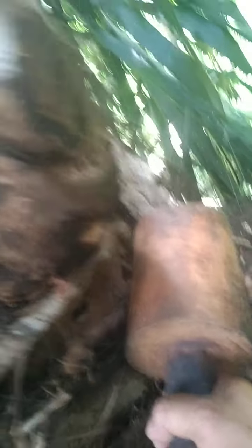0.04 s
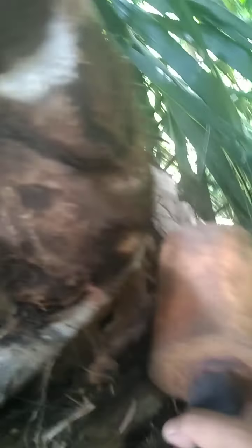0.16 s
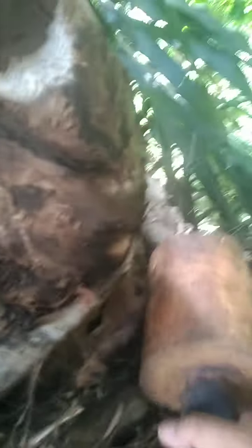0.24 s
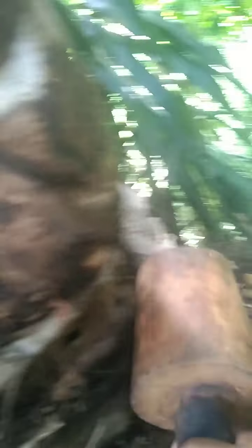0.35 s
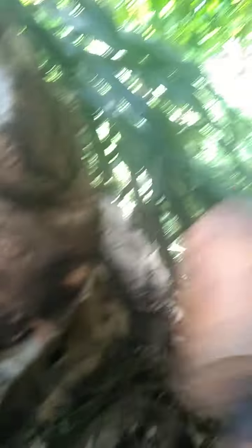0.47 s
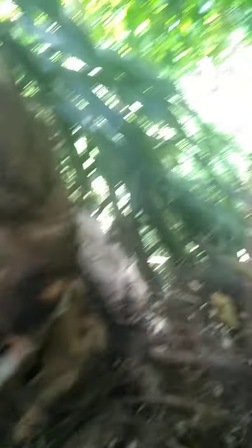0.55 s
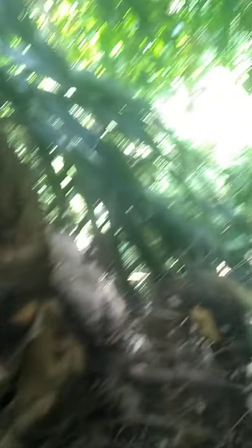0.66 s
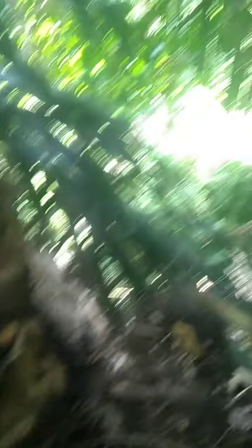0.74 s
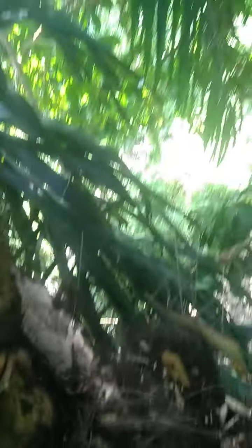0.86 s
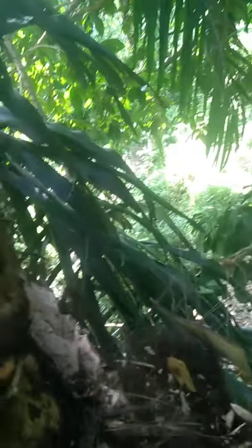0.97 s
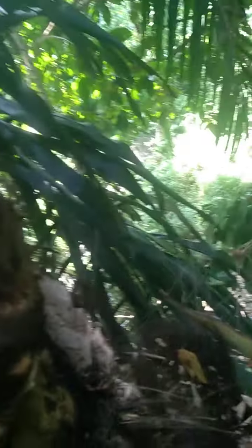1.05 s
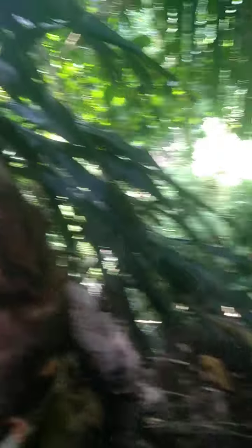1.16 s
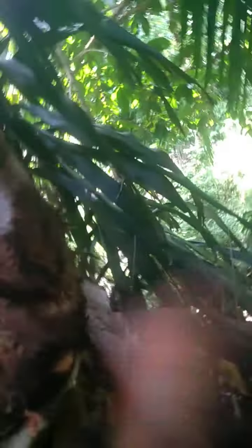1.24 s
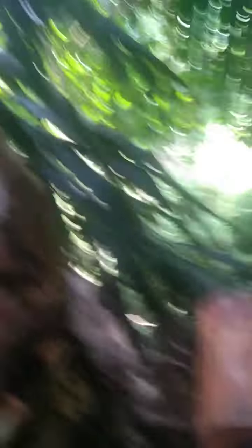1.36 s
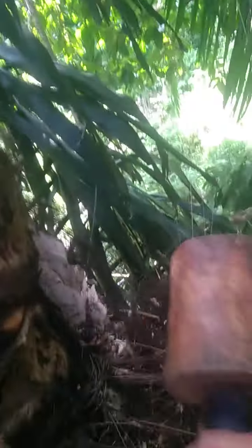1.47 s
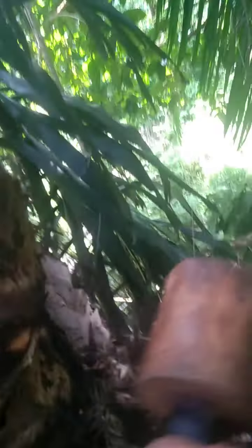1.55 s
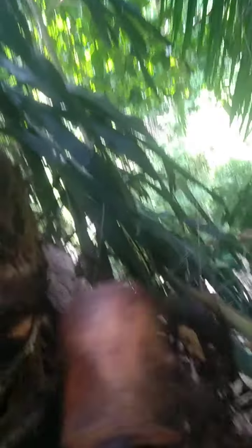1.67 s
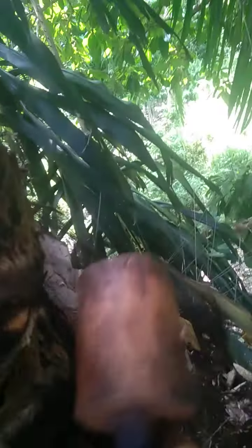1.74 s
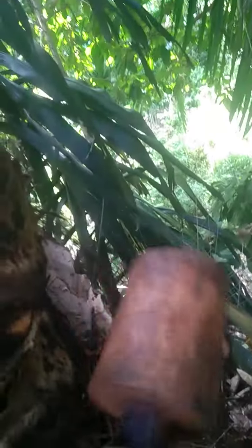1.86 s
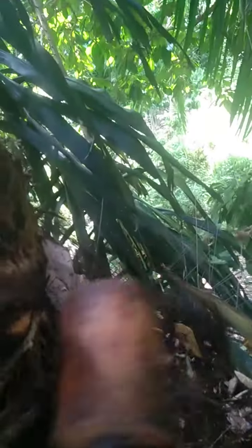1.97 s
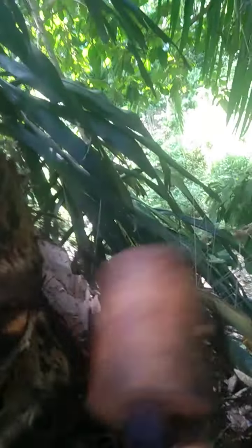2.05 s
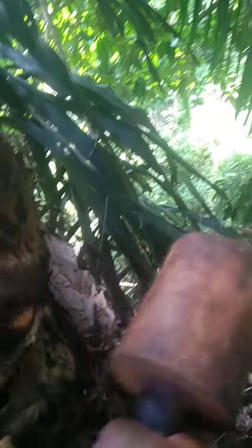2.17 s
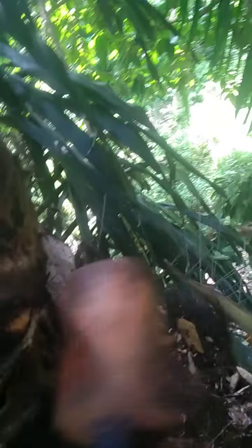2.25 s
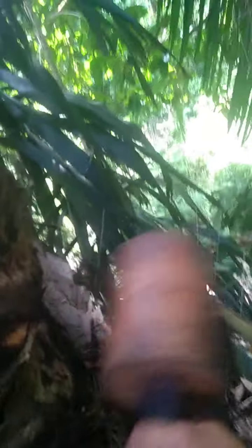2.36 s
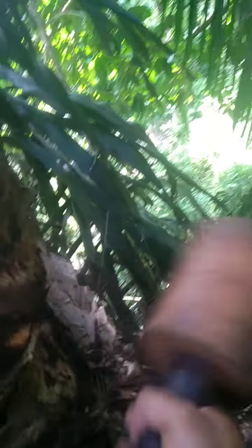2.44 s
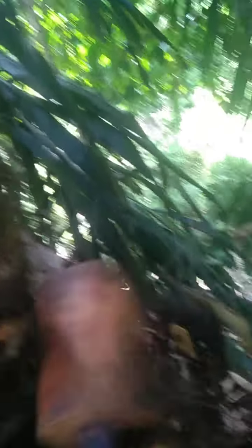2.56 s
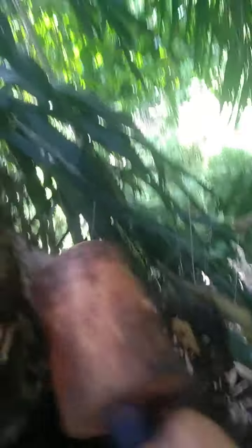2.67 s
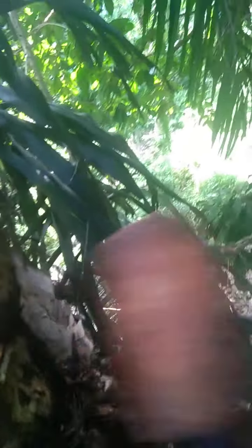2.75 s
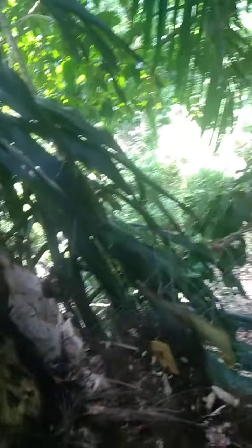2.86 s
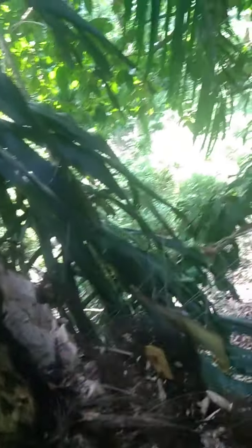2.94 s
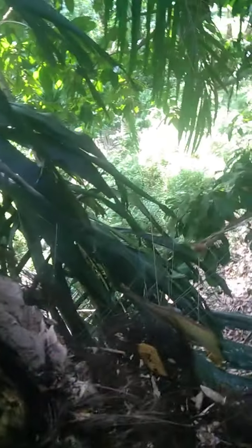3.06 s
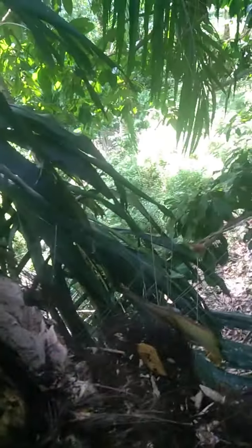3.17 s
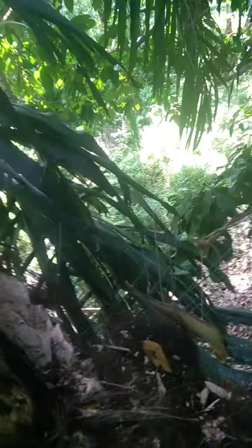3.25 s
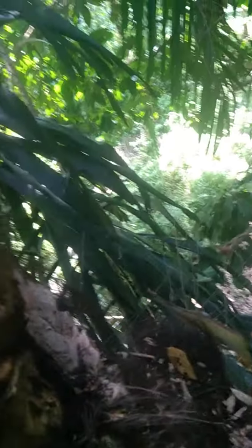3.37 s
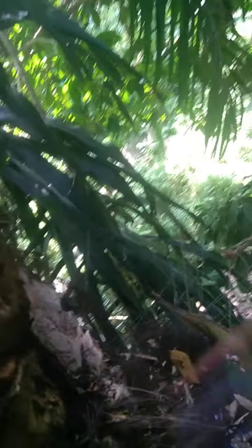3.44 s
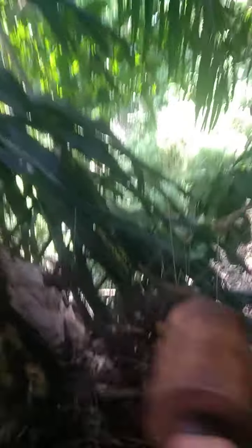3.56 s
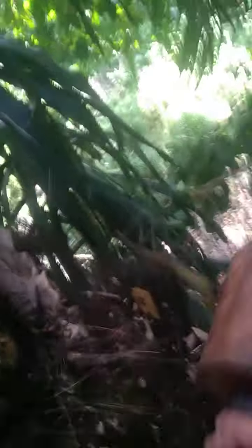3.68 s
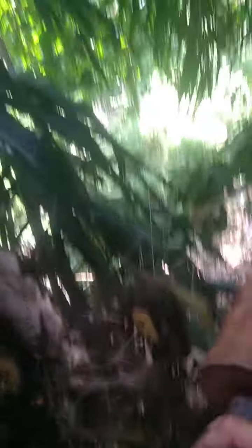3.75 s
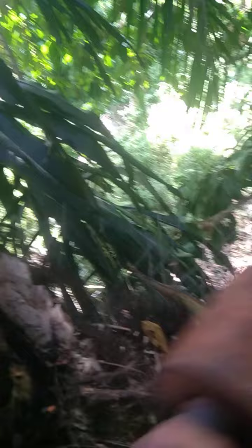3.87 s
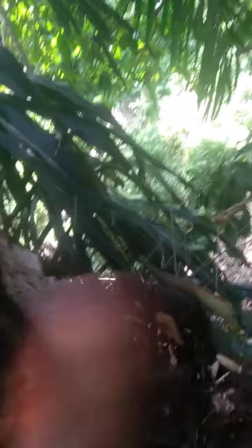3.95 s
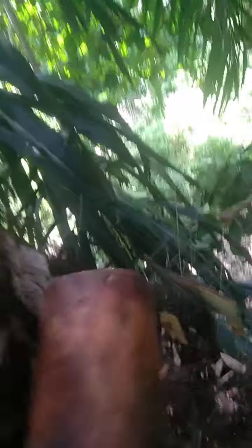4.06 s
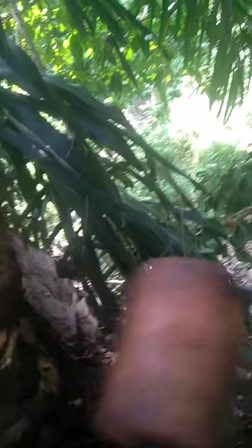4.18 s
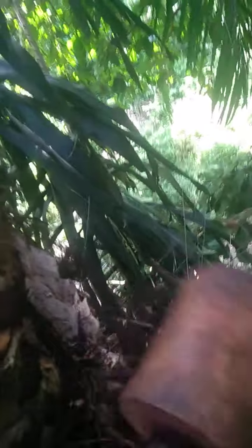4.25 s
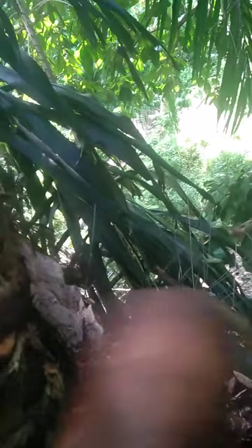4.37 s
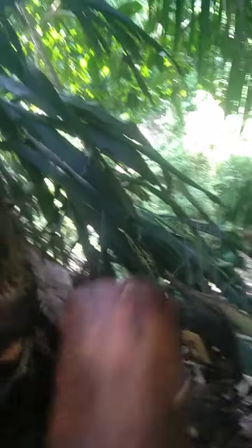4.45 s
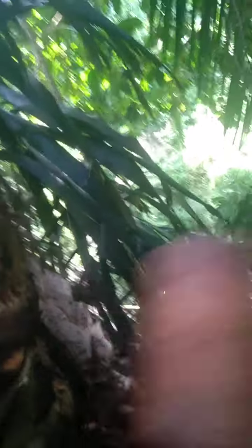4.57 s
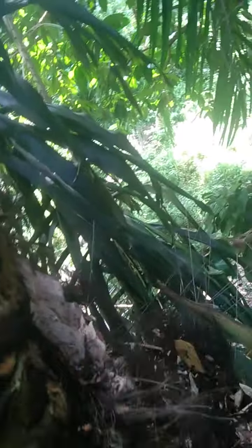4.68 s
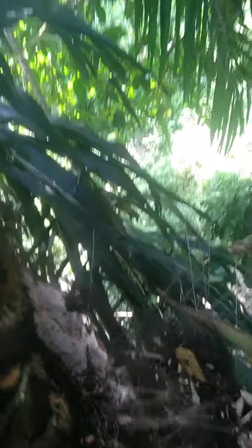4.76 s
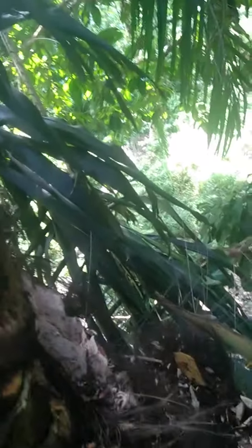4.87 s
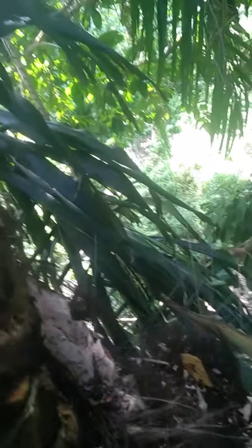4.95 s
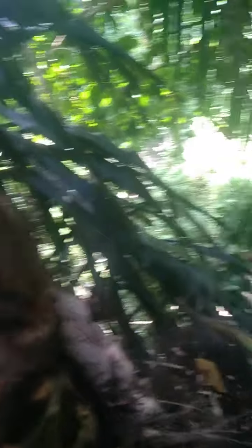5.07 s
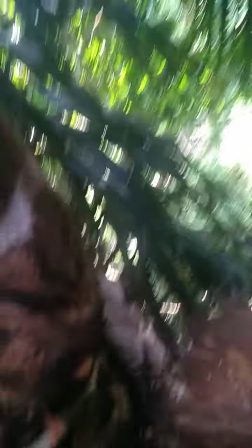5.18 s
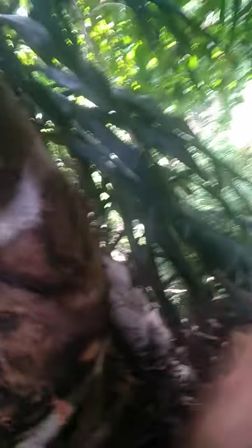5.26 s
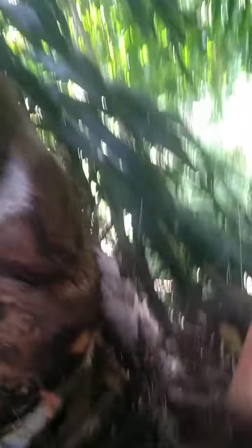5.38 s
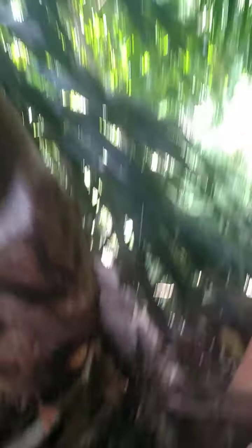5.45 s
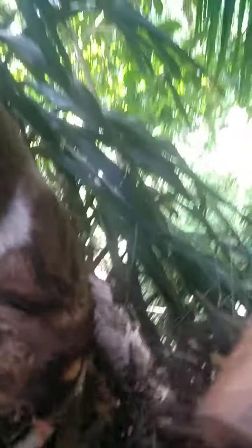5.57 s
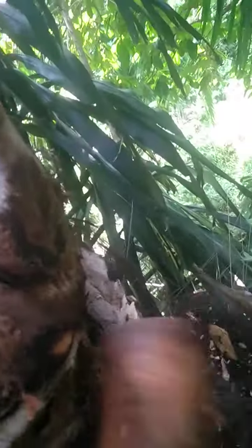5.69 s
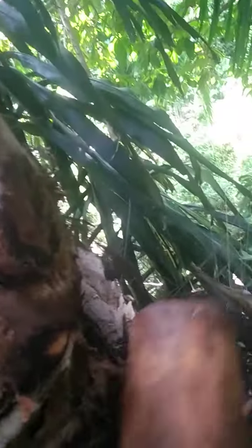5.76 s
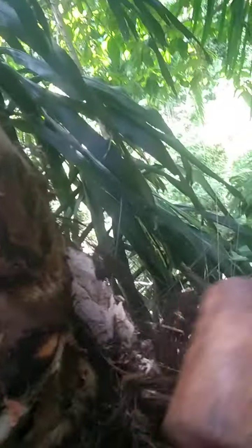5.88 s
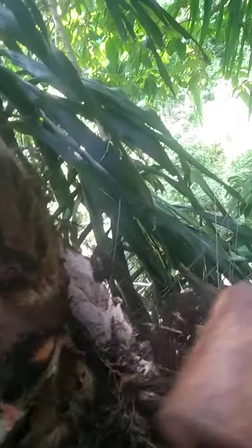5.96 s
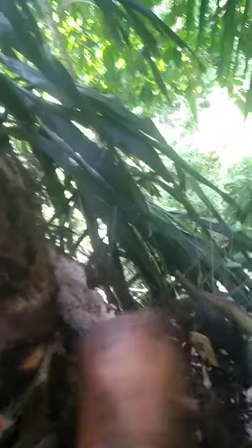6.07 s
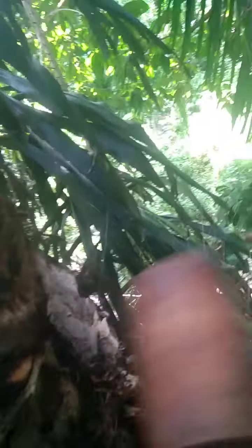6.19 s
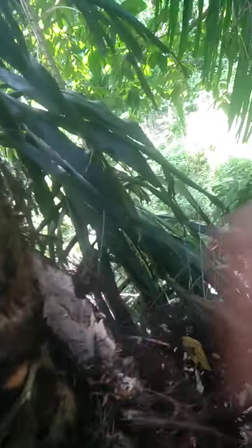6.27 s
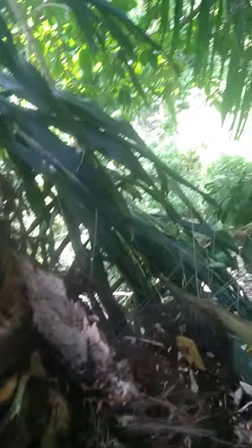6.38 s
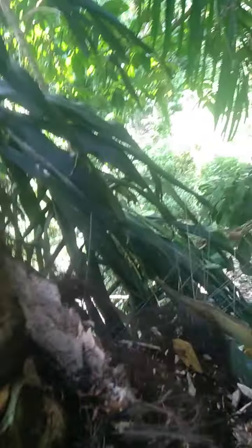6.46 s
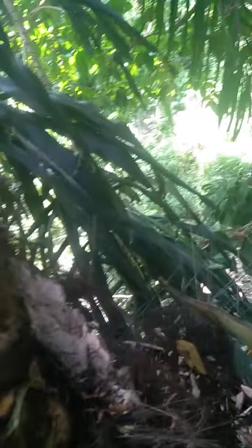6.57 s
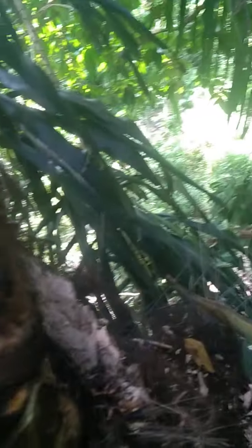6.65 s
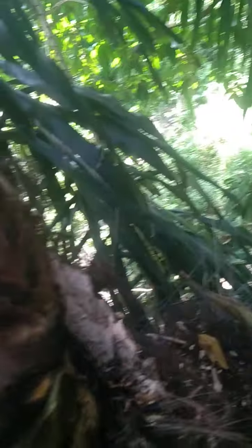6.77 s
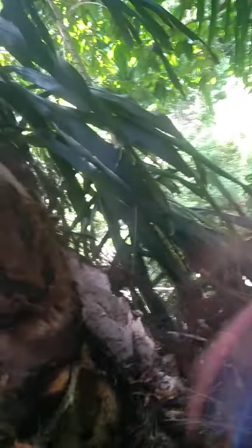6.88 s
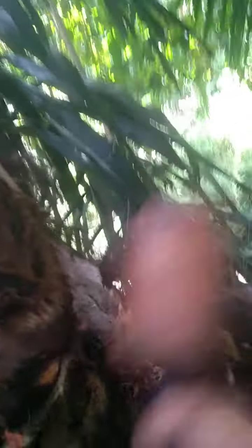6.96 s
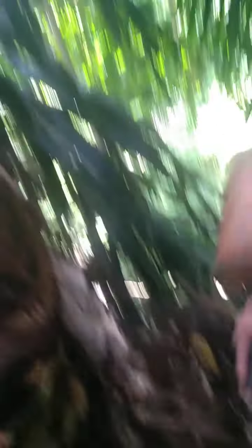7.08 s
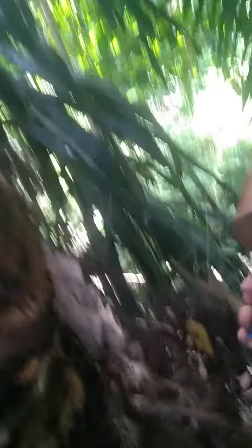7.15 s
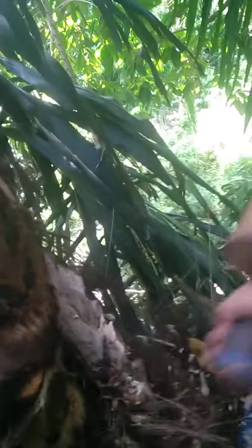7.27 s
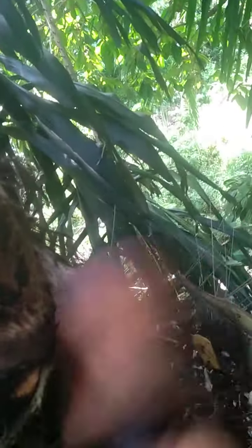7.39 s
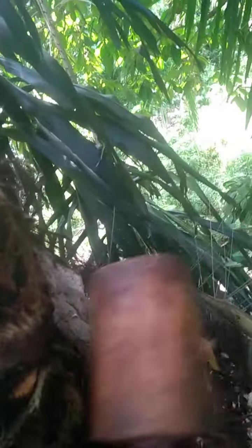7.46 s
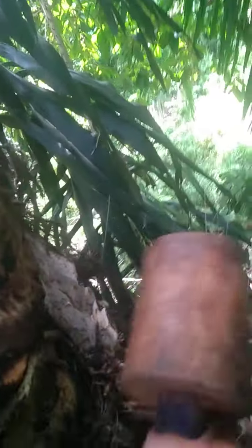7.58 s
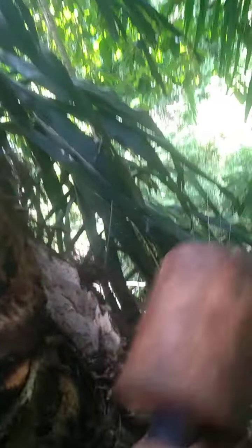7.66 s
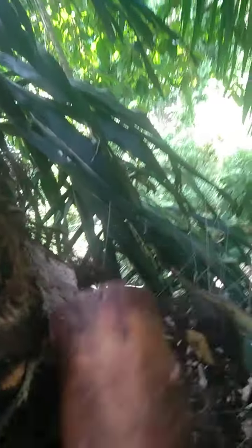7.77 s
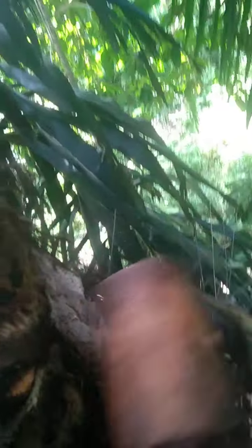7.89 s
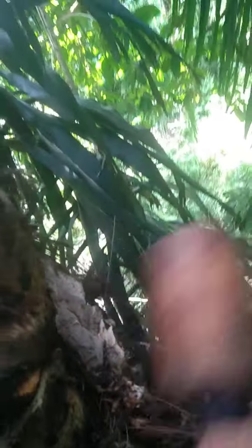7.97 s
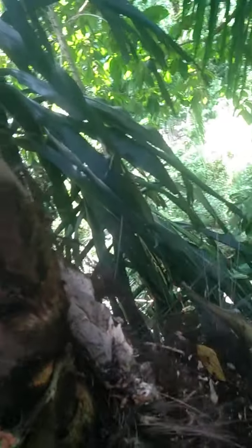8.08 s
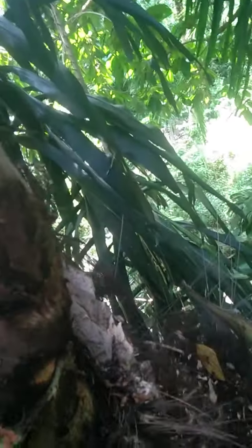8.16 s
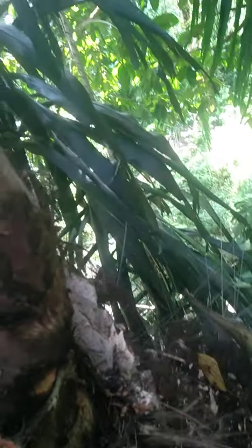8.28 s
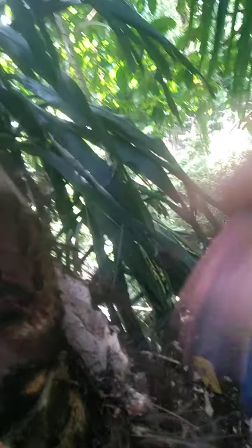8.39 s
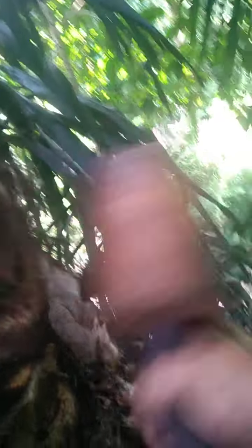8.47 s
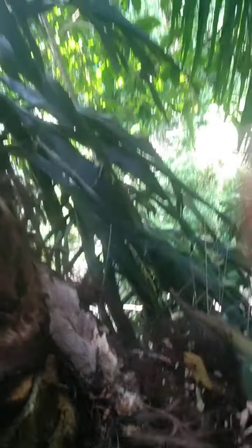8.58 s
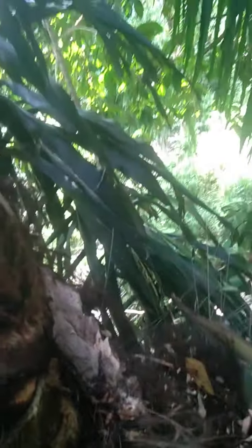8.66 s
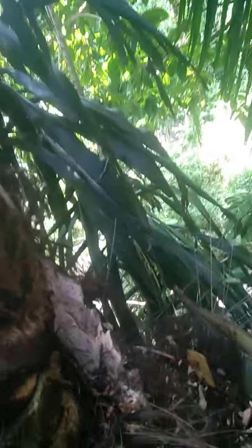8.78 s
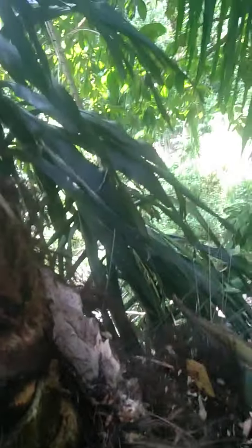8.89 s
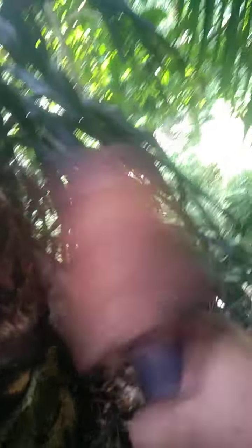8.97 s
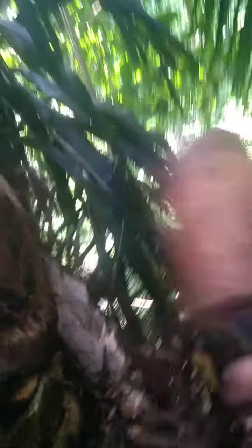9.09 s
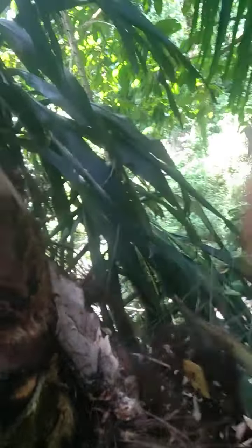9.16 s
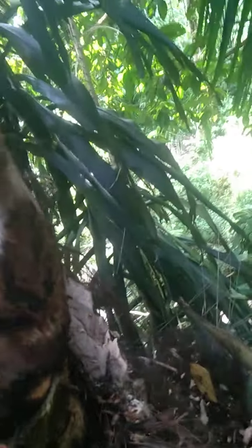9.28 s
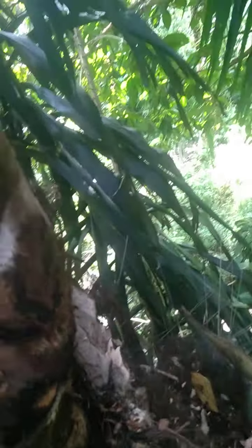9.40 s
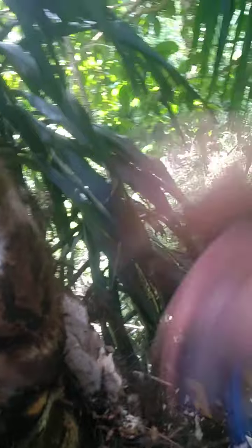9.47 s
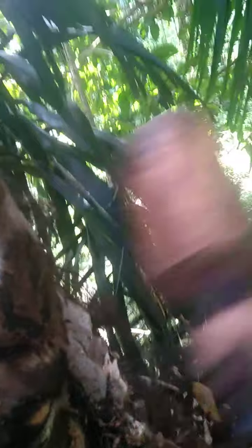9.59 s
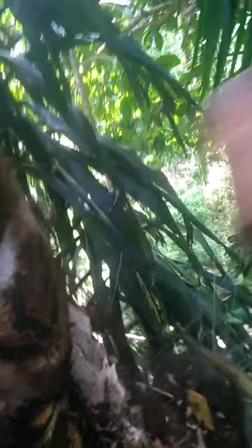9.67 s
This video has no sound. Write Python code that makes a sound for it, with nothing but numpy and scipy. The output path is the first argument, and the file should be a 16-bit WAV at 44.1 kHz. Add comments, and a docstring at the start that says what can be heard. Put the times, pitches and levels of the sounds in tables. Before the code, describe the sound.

A heavy wooden mallet knocks a palm stalk close by in irregular dull, woody blows, over a high steady insect drone and bird calls.

```python
"""Insects drone over a soft forest wash and birds call; leaves crackle and dry fibres tick.
Then a heavy wooden mallet beats a palm stalk close by: each blow is a few fast-dying rings plus a noise crack.
Each knock comes back from the ground, trunks and fronds as single echoes, scatter and a longer tail.
Insects and wash are shaped noise; birds are gliding, fluttering tones.
Hard blows overload the microphone, and its gain control ducks the drone, which then swells back."""
import sys
import numpy as np
from scipy import signal
from scipy.fft import rfft, irfft, next_fast_len
from scipy.io import wavfile
from scipy.ndimage import uniform_filter1d

SR = 44100
rng = np.random.default_rng(int(sys.argv[2]) if len(sys.argv) > 2 else 0)


def generate_wav(signal):
    """Clip the signal to [-1, 1] and save it as 16-bit WAV at the path in sys.argv[1]."""
    frames = np.transpose(np.atleast_2d(signal))
    scaled = np.clip(frames, -1, 1) * 32767
    pcm = np.round(scaled).astype(np.int16)
    wavfile.write(sys.argv[1], SR, pcm)


N = 429093
TIME = np.arange(N) / SR

# Tone colour of crushed fibres. Each row: frequency in Hz, relative level in dB.
FIBRE_COLOUR = [(30, -51), (150, -22), (700, 9.5), (1500, -4), (2200, -13), (3000, -14.5), (4500, -10.5),
                (6500, -18), (9000, -31.5), (16000, -36.5)]


def gain_of(db):
    """Turns decibels into an amplitude factor."""
    return 10 ** (np.asarray(db) / 20)


def evened(x):
    """Scales a sound so that its average strength (rms) is 1."""
    return x / np.sqrt(np.mean(x ** 2) + 1e-20)


def read(points, hz, axis=1):
    """Reads one column of a table at any frequency, joining its points over log frequency."""
    table = np.transpose(points)
    return np.interp(np.log(hz + 1), np.log(table[0] + 1), table[axis])


def add(mix, s, sound):
    """Mixes a sound in at time s, in seconds."""
    part = mix[max(round(s * SR), 0):][:len(sound)]
    part += sound[:len(part)]


def filtered(x, hz, kind="low", order=2):
    """Keeps the low, high or middle frequencies with a Butterworth filter."""
    edges = np.clip(hz, 5, SR / 2 - 100)
    return signal.sosfilt(signal.butter(order, edges, kind, fs=SR, output="sos"), x)


def noise(shape, size):
    """Noise of rms 1 whose amplitude at each frequency follows shape(Hz)."""
    full = next_fast_len(size)
    spectrum = rfft(rng.standard_normal(full)) * shape(np.fft.rfftfreq(full, 1 / SR))
    return evened(irfft(spectrum, full)[:size])


def song(notes, length_s, glide, arch, fuzz_hz):
    """One bird's notes share a length and a contour; glide and arch are shares of the pitch."""
    out, size = np.zeros(N), round(length_s * SR)
    along = np.linspace(-1, 1, size)
    contour = 1 + glide * along / 2 + arch * (1 - along ** 2)
    for s, hz, db in notes:
        flutter = noise(lambda f: np.exp(-(f / fuzz_hz) ** 2), size)
        tone = np.sin(2 * np.pi * np.cumsum(hz * contour) / SR)
        soft_ends = signal.windows.tukey(size, .5)
        add(out, s, gain_of(db) * flutter * tone * soft_ends)
    return out


def distant_notes(count=14, low_hz=1750, high_hz=3300, level_db=-63.0, spread_db=2.5):
    """Faint notes from deeper in the forest, at random times, pitches and levels."""
    return [(when * N / SR, low_hz * (high_hz / low_hz) ** pitch, level_db + spread_db * (2 * loud - 1))
            for when, pitch, loud in rng.random((count, 3))]


def birds(echo_s=0.14, echo_db=0):
    """Bird calls, smeared by a dying noise echo for the leaves they pass through."""
    # Each row of these four: start in seconds, base pitch in Hz, level in dB.
    # A near bird repeats one falling whistle.
    whistles = [(0, 3370, -56), (.33, 3680, -44.5), (.64, 3505, -50), (1.14, 3670, -46), (1.44, 3465, -52)]
    # A far bird holds low, nearly level notes.
    far_notes = [(.42, 2110, -64), (.6, 1800, -62), (2.12, 2086, -59), (4.25, 2170, -62),
                 (4.53, 2140, -60.5)]
    # A small bird gives thin arched calls.
    thin_calls = [(.85, 8370, -44.5), (7.24, 8300, -52.5), (9.22, 8330, -50), (9.56, 8100, -44)]
    # Another gives rising buzzes.
    buzzes = [(5.11, 5520, -41), (5.14, 6000, -40.5), (5.275, 5000, -44)]
    out = song(whistles, length_s=.15, glide=-0.094, arch=.004, fuzz_hz=110)
    out += song(far_notes + distant_notes(), length_s=0.2, glide=-0.011, arch=.02, fuzz_hz=28)
    out += song(thin_calls, length_s=0.12, glide=0.028, arch=0.022, fuzz_hz=200)
    out += song(buzzes, length_s=.08, glide=0.15, arch=0.0052, fuzz_hz=380)
    t = np.arange(SR // 2) / SR
    echo = rng.standard_normal(len(t)) * np.exp(-t / echo_s)
    echo /= np.linalg.norm(echo)
    return out + gain_of(echo_db) * signal.fftconvolve(out, echo)[:N]


def insects(flicker_db=0.75, flicker_hz=25, swell_db=.5, swell_hz=2.3):
    """Countless insects blur into narrow noise bands that shimmer and swell together."""
    # The main chorus, its skirts, its octave and a lower chorus.
    # Each row: centre in Hz, spread in Hz, level in dB.
    choruses = [(7026, 295, -36), (6840, 880, -55), (14200, 830, -51.5), (4566, 160, -60.5)]
    # Slow changes of the whole drone. Each row: time in seconds, level change in dB.
    drone_level = [(0, -1), (8.3, 1), (9.1, -4), (9.73, -1.5)]
    drone = np.zeros(N)
    for hz, spread, db in choruses:
        drone += gain_of(db) * noise(lambda f: np.exp(-((f - hz) / (2 * spread)) ** 2), N)
    flicker = noise(lambda f: 1 / (1 + (f / flicker_hz) ** 2), N)
    swell = noise(lambda f: 1 / (1 + (f / swell_hz) ** 2), N)
    slow_db = np.interp(TIME, *np.transpose(drone_level))
    return drone * gain_of(slow_db + swell_db * swell + flicker_db * flicker)


def air(level_db=-51.5, sway_db=.4, sway_hz=4):
    """The far wash of the forest: shaped noise whose level sways a little."""
    # Tone colour of the wash. Each row: frequency in Hz, relative level in dB.
    wash_colour = [(15, -50), (25, -33.5), (56, -9.5), (145, 0.5), (300, -7), (500, -13.5), (780, -16),
                   (1230, -15.5), (1800, -22), (2600, -22.5), (3200, -30), (5500, -22), (8000, -30.5),
                   (12000, -43.5)]
    sway = noise(lambda f: 1 / (1 + (f / sway_hz) ** 2), N)
    return gain_of(level_db + sway_db * sway) * noise(lambda f: gain_of(read(wash_colour, f)), N)


def burst(hz, spread, decay_s, grain):
    """Grainy noise from hz / spread to hz * spread that dies away."""
    t = np.arange(SR // 8) / SR
    grains = rng.standard_normal(len(t)) * np.exp(grain * rng.standard_normal(len(t)))
    return evened(filtered(grains, [hz / spread, hz * spread], "band")) * np.exp(-t / decay_s)


def near_echoes(x, near_s=0.013, far_s=0.049, fade_s=0.035, beyond_db=-8, bark_hz=2200):
    """Adds single echoes from ground and trunks, and a cluster of scatter from the near fronds."""
    # Single echoes. Each row: delay in seconds, level in dB.
    single_echoes = [(.0037, -13.5), (.0073, -9), (0.0234, -17), (0.03, -30)]
    # Tone colour of the scatter. Each row: frequency in Hz, level in dB.
    frond_colour = [(80, -27.5), (300, -21.5), (600, -17), (1100, -8.5), (1750, -9), (2500, -13),
                    (6000, -23), (15000, -22)]
    t = np.arange(SR // 4) / SR
    # about 3000 random reflections a second, fading in after near_s and weaker after far_s
    taps = rng.choice([-1., 1.], len(t)) * (rng.random(len(t)) < 3000 / SR)
    beyond = gain_of(beyond_db) * np.exp((far_s - t) / fade_s)
    taps *= np.clip(t / near_s - 1, 0, 1) * np.where(t < far_s, 1, beyond)
    colour = gain_of(read(frond_colour, np.fft.rfftfreq(len(t), 1 / SR)))
    scatter = irfft(rfft(taps / np.linalg.norm(taps)) * colour, len(t))
    single = np.zeros(len(t))
    for delay, db in single_echoes:
        single[round(delay * SR)] += gain_of(db)
    single = filtered(single, bark_hz, order=1)  # soil and bark swallow the treble
    return x + signal.fftconvolve(x, scatter + single)[:N]


def small_sounds(bump_s=0.0028, bump_rise_s=0.0018):
    """Ticks are short grainy bursts, crackles longer and wider ones; bumps are very short low tones."""
    # Single dry twigs snap. Each row: start in seconds, level before decay in dB, centre in Hz.
    ticks = [(0.311, -35, 1930), (3.128, -38.5, 1090), (3.2185, -36.5, 2550), (3.278, -33, 1480),
             (3.3248, -30, 1540), (4.76, -35.5, 3840), (6.605, -38, 3980), (6.88, -34.5, 2300),
             (6.937, -35.5, 1460)]
    # Dry leaves crackle in brief flurries. Each row: start in seconds, level before decay in dB.
    crackles = [(0.178, -35), (1.041, -41.5), (3.287, -42), (3.431, -46.5), (6.514, -41), (6.564, -37.5),
                (6.911, -42)]
    # Soft low bumps and taps, the strongest just after hard blows.
    # Each row: start in seconds, level before fades in dB, pitch in Hz.
    bumps = [(0.187, -20, 209), (0.314, -15, 105), (3.129, -24, 86), (3.751, -4.5, 110), (4.42, -22.5, 463),
             (5.435, -6.5, 131)]
    out, t = np.zeros(N), np.arange(SR // 8) / SR
    for s, db, hz in ticks:
        add(out, s, gain_of(db) * burst(hz, spread=1.8, decay_s=0.0036, grain=0.84))
    for s, db in crackles:
        add(out, s, gain_of(db) * burst(hz=4100, spread=5.0, decay_s=0.03, grain=1.1))
    bump_shape = np.exp(-t / bump_s) * (1 - np.exp(-t / bump_rise_s))
    for s, db, hz in bumps:
        add(out, s, gain_of(db) * np.sin(2 * np.pi * hz * t) * bump_shape)
    return near_echoes(out)


def rustles(clump_db=3, clump_hz=80):
    """Leaves and sleeve brush past: swells of fibre noise with an uneven, clumpy level."""
    # Rustles as the arm moves. Each row: start in seconds, length in seconds, level in dB.
    swells = [(0.728, 0.31, -53.5), (2.862, 0.19, -54.5), (3.521, 0.12, -48.5), (8.85, 0.55, -52.5),
              (9.137, 0.79, -49.5)]
    out = np.zeros(N)
    for s, length, db in swells:
        size = round(length * SR)
        clumps = gain_of(clump_db * noise(lambda f: 1 / (1 + (f / clump_hz) ** 2), size))
        # half the decibels: a flatter colour than a crack has
        fibres = noise(lambda f: gain_of(read(FIBRE_COLOUR, f) / 2), size)
        add(out, s, gain_of(db) * np.hanning(size) * clumps * fibres)
    return out


def knock(force_db, contact_hz, low_db, crack_db, low_hz=430, crack_s=0.0017,
          splinter_db=-30, splinter_s=0.061, spot_db=1.5, detune=0.023):
    """A soft contact rings only the low modes; a hard one reaches the high ones and cracks fibres."""
    # Stalk and mallet ring together. Each row: pitch in Hz, level in dB, time to fall 60 dB in seconds.
    modes = [(117, -29.5, 0.043), (201, -14, .06), (234.1, -11, 0.039), (320.5, -10, 0.07),
             (376.8, -9, 0.031), (507, -2.5, 0.025), (697.6, -5, 0.033), (853, -4.5, 0.014),
             (1021, -4.5, .026), (1172.7, -6.5, 0.033), (1381, -6, .02), (1690, -6.5, 0.0046),
             (2160, -23.5, 0.014)]
    t = np.arange(SR // 4) / SR
    ring = np.zeros(len(t))
    # each blow lands on a slightly different spot, so levels and pitches vary
    spots = rng.standard_normal((len(modes), 2))
    for k, ((hz, db, t60), (louder, sharper)) in enumerate(zip(modes, spots)):
        level_db = db + spot_db * louder + low_db / (1 + (hz / low_hz) ** 4)
        reach = 1 / np.sqrt(1 + (hz / contact_hz) ** 6)
        direction = (-1) ** k  # neighbouring modes start in opposite directions
        tone = np.sin(2 * np.pi * hz * (1 + detune * sharper) * t)
        ring += direction * reach * gain_of(level_db - 60 * t / t60) * tone
    fading = np.exp(-t / crack_s) + gain_of(splinter_db) * np.exp(-t / splinter_s)
    crack = noise(lambda f: gain_of(read(FIBRE_COLOUR, f)), len(t)) * fading
    return gain_of(force_db) * (gain_of(crack_db) * crack + filtered(ring, 2 * contact_hz))


def thud(force_db, trunk_db=-42, growth=1.8, trunk_hz=90, decay_s=0.022):
    """The trunk's low shake grows faster than the force, so it matters only in the hardest blows."""
    t = np.arange(SR // 4) / SR
    return gain_of(trunk_db + growth * force_db) * np.sin(2 * np.pi * trunk_hz * t) * np.exp(-t / decay_s)


def forest_tail(build_s=0.017):
    """Diffuse echo from distant trees: noise dying soonest around 2 kHz and in the deep bass."""
    # The tail by band. Each row: frequency in Hz, level in dB, time to fall 60 dB in seconds.
    tail_bands = [(80.4, -42, 0.17), (297, -17, 1), (550, -27, 1.0), (1020, -17.5, 0.87), (1600, -22, 0.98),
                  (2100, -10.5, 0.093), (6100, -22.5, 0.3), (15000, -28.5, 0.3)]
    hz, t, z = signal.stft(rng.standard_normal(SR), SR, nperseg=256)
    t60 = read(tail_bands, hz, axis=2)[:, None]
    level = gain_of(read(tail_bands, hz)[:, None] - 60 * t / t60)
    level *= np.sqrt(np.log(1e6) / (t60 * SR))  # a longer tail starts softer, for the same energy
    return signal.istft(z * level * np.clip(t / build_s, 0, 1), SR, nperseg=256)[1]


def mallet(push_db=-50, push_s=0.013):
    """Every blow, with the cushion of air that the mallet head pushes, its echoes and its forest tail."""
    # Mallet blows. Each row: time in seconds, force in dB, contact cut-off in Hz,
    # share of the blow that lands on loose husk (0 to 1).
    blows = [(1.3560, 16.5, 1500, 0.63), (1.7847, 9, 620, 0), (2.0784, 6, 497, 0), (2.3713, 2.5, 820, 0.38),
             (2.6854, 7, 1158, 0.44), (3.6100, 16.5, 1990, 0.46), (4.1040, 5, 850, 0.41),
             (4.5307, 3.5, 874, 0.16), (5.3452, 17.5, 1700, 0.6), (5.808, 6.5, 597, 0),
             (6.1765, 3.5, 735, 0.56), (7.0547, 14.5, 2000, 0.85), (7.5268, 6, 890, 0.52),
             (7.873, 0.5, 898, 0.84), (8.5580, 6.5, 546, 1), (9.1103, 5, 600, 1), (9.648, 4.5, 470, 1)]
    near, far = np.zeros((2, N))
    push = np.hanning(round(push_s * SR))
    for s, force_db, contact_hz, husk in blows:
        # force thins the low modes and raises the crack; loose husk adds to both
        low_db = 1.5 - 0.38 * force_db + 7.5 * husk
        crack_db = -24 + 0.7984 * force_db + 13.5 * husk
        blow = knock(force_db, contact_hz, low_db, crack_db)
        add(near, s, blow + thud(force_db))
        add(near, s - push_s / 2, gain_of(force_db + push_db) * push)  # starts just before the blow
        add(far, s, signal.fftconvolve(blow, forest_tail()))
    return near_echoes(near) + far


def scene():
    """Near sounds with their echoes, over the forest's steady life."""
    return (birds() + insects() + air() + small_sounds() + rustles() + mallet())[None]


def excess_db(x, threshold_db, window_s, recovery_db, attack_s):
    """How far the recent level stood over a threshold: smoothed over attack_s, recovers in dB a second."""
    level_db = 10 * np.log10(filtered(x ** 2, 1 / (2 * np.pi * window_s), order=1) + 1e-12)
    fall = recovery_db * TIME
    held_db = np.maximum.accumulate(level_db + fall) - fall  # peaks held, then sinking steadily
    over = np.maximum(held_db - threshold_db, 0)
    return filtered(over, 1 / (2 * np.pi * attack_s), order=1)


def suppressed(x, quiet_db=-66.5):
    """A noise suppressor turns down whatever bands have fallen nearly silent."""
    z = signal.stft(x, SR, nperseg=512)[2]
    over_time = uniform_filter1d(abs(z) ** 2, 7, axis=1)
    power = uniform_filter1d(over_time, 3, axis=0) * 512 / 1.5
    keep = power ** 2 / (power ** 2 + gain_of(quiet_db) ** 4)
    return signal.istft(z * keep, SR, nperseg=512)[1][:N]


def record(dry, ceiling=0.69, bass_hz=48, treble_hz=7800, edge_hz=16200):
    """Bass cut, slow gain control, overload, quick limiter, treble cut, noise suppression, band limit."""
    x = filtered(dry[0], bass_hz, "high")
    x = x / gain_of(excess_db(x, threshold_db=-8.0, window_s=0.014, recovery_db=11.5, attack_s=.035))
    x = x / (1 + (x / ceiling) ** 8) ** (1 / 8)  # overload: bends towards the ceiling
    x = x / gain_of(excess_db(x, threshold_db=-8, window_s=.002, recovery_db=100, attack_s=.003))
    x = suppressed(filtered(x, treble_hz))
    band_limit = signal.firwin(511, edge_hz, window=("kaiser", 9), fs=SR)
    return signal.oaconvolve(x, band_limit, "same")[None]


dry = scene()
out = record(dry)
generate_wav(out)
```